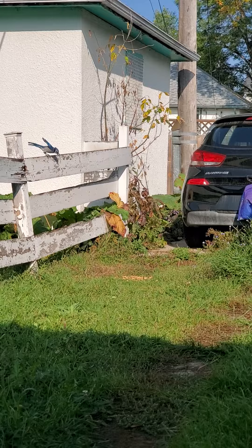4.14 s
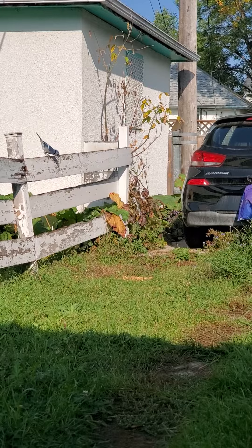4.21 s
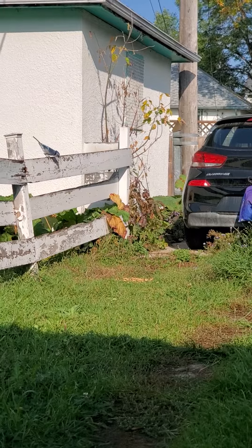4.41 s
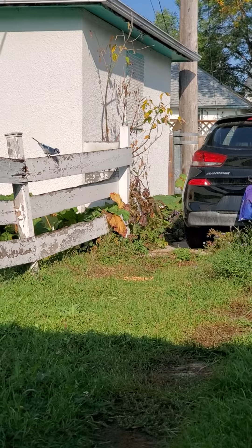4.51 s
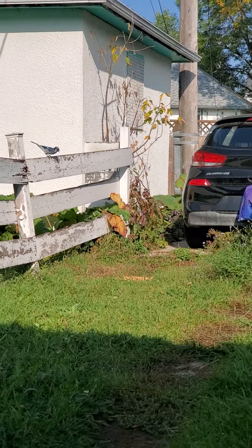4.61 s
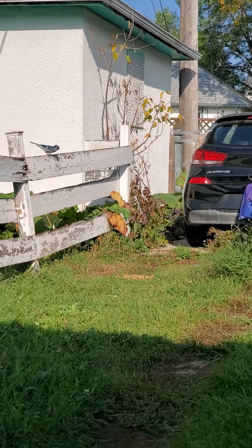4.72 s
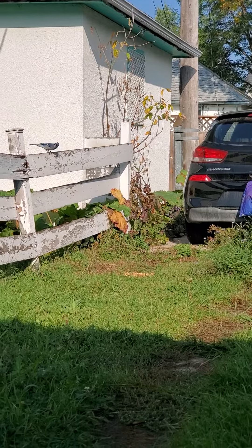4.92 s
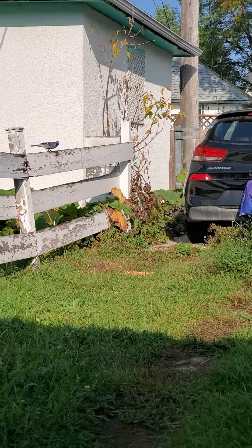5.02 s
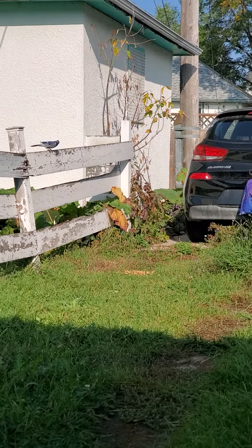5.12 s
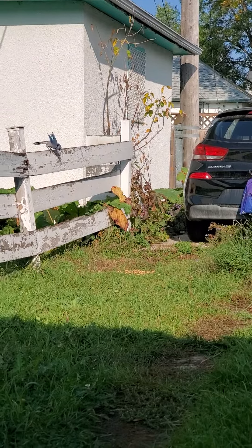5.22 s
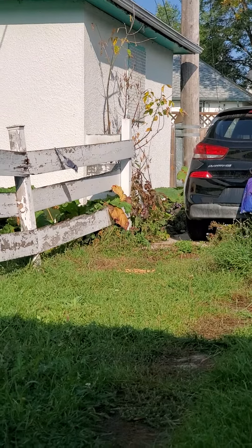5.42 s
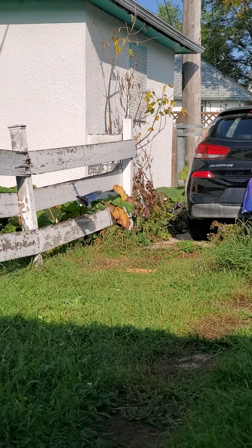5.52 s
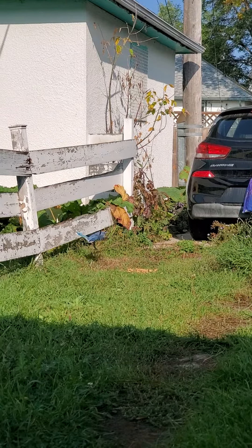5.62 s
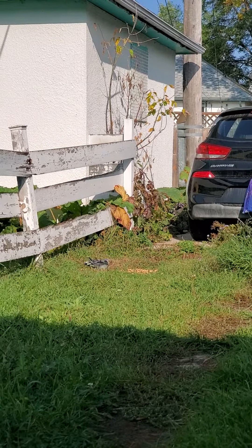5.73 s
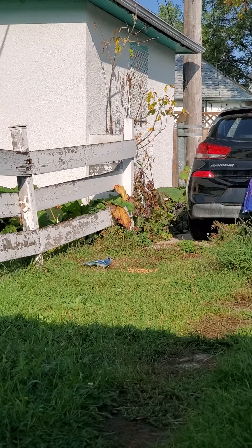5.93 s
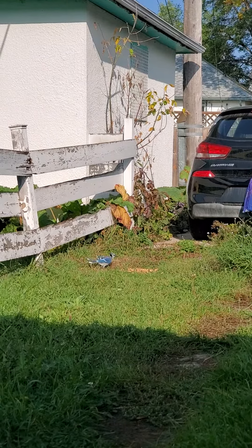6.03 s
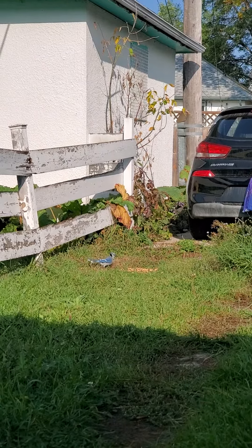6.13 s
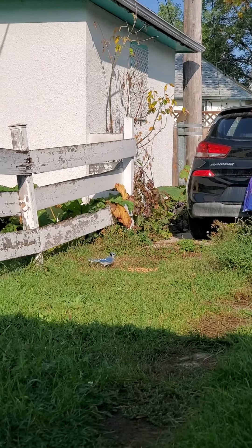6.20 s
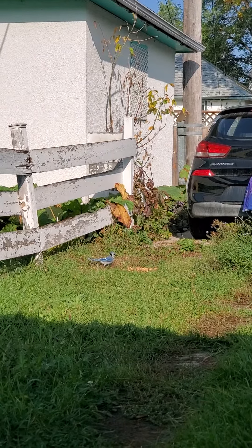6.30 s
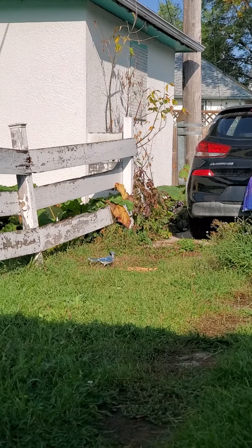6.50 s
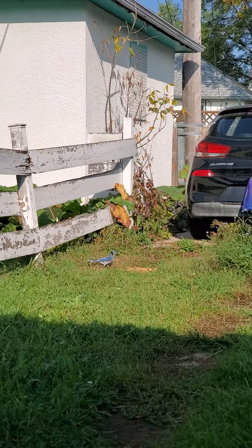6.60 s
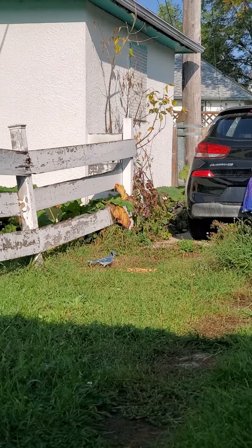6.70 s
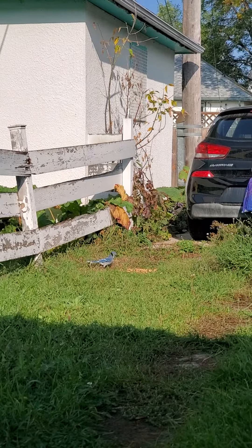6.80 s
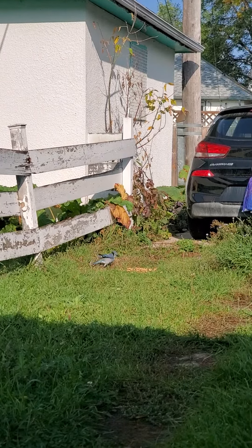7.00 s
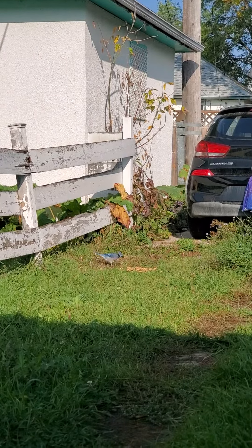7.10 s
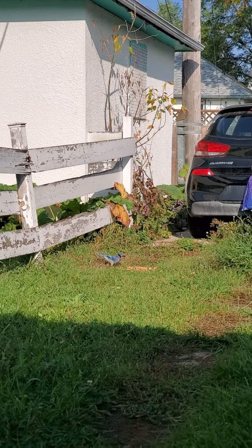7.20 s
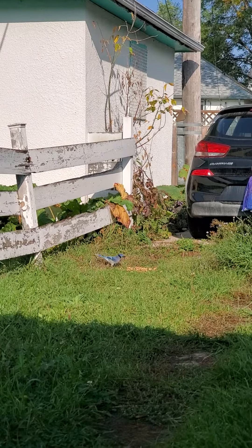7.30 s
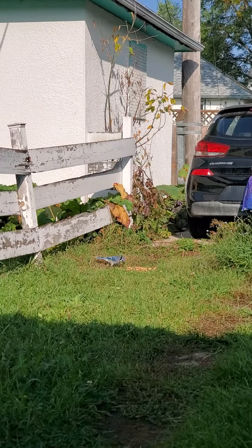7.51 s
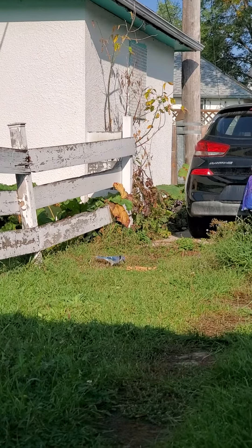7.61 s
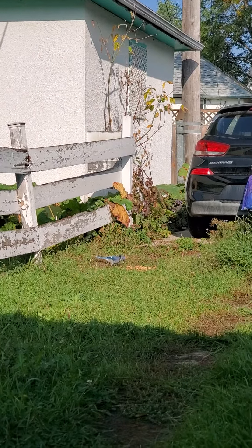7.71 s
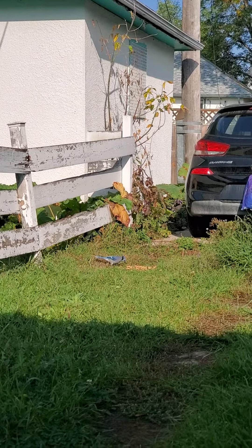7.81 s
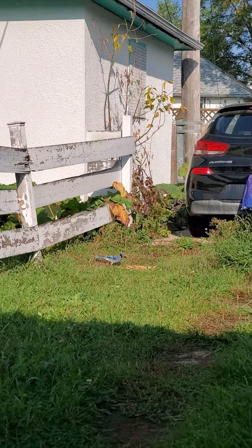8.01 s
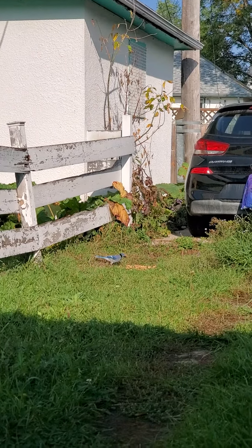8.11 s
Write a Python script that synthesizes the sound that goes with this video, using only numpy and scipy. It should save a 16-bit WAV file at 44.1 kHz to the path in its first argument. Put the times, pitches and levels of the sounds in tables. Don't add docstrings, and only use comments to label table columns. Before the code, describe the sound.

A back yard heard in stereo through a phone, with slight echoes from house walls. At once a sharp, falling jay bark sounds, then a louder one at 0.2 s, and until about 1.9 s several jays trade rapid, short, raspy notes, low and nasal against higher and brighter, with faint distant replies. Low wind gusts thump the microphone unevenly left and right, with tiny dry leaf crackles, fading after 2.2 s. Steady low traffic rumble and barely audible leaf hiss remain. Soft, low jay notes come singly at 2.6, 3.4, 3.7, 4.7, 5.0 and 6.4 s. Thin high sparrow chips recur throughout, clustered at 3.3-3.8 s and strongest at 6.9 s. A short scrape and hollow wooden knock lands at 3.2 s, a soft tap at 3.6 s. Faint leaf rustle comes at 5.75 s. From 5.8 s distant jays call weakly, and a deep, short croak ends it near 8 s.

```python
import sys
import numpy as np
from scipy import signal
from scipy.fft import rfft, irfft, next_fast_len
from scipy.io import wavfile
from scipy.ndimage import uniform_filter1d, map_coordinates

SR = 44100
rng = np.random.default_rng(int(sys.argv[2]) if len(sys.argv) > 2 else 0)


def voltage_ratio(decibels):
    exponent = np.asarray(decibels, float) / 20
    return 10 ** exponent


def file_out(sig):
    cols = np.atleast_2d(sig).T
    lim = np.clip(cols, -1, 1)
    pcm = np.round(lim * 32767).astype(np.int16)
    wavfile.write(sys.argv[1], SR, pcm)


N = 359415

# [t/s, level/dB]
TRAFFIC = [
    (2.3, -49.5),
    (3.1, -48),
    (3.9, -47.5),
    (4.3, -51.5),
    (4.6, -49.5),
    (5.1, -52),
    (5.8, -52.5),
    (6.5, -51.5),
    (7.2, -50),
    (8.15, -51),
]
# [t/s, level/dB]
BREEZE = [
    (0, -75.5),
    (.6, -77.5),
    (2.45, -78),
    (2.84, -75),
    (3.38, -78.5),
    (6.56, -80.5),
    (8.15, -81.5),
]
# [f/Hz, level/dB per Hz]
RUMBLE_SPECTRUM = [(12, -58), (20, -14), (27, -17), (47, -1.5), (65, 2.5), (93, 1), (113, -8.5), (144, -11),
                   (250, -26), (320, -19), (550, -120)]
HUM_SPECTRUM = [(88, -25), (150, -1), (342, -9), (394, -7.5), (475, -13.5), (780, -13.5), (1290, -18),
                (1780, -22.5), (2500, -22), (3250, -52), (5500, -120)]
LEAF_SPECTRUM = [(590, -64), (1000, -9), (1290, -8), (2020, -12.5), (3290, -7), (4390, -11), (6430, -12.5),
                 (7560, -19), (7920, -26.5), (8390, -37), (9860, -29), (10300, -29.5), (10900, -23),
                 (15100, -24.5), (15800, -17)]
BUFFET_SPECTRUM = [(12, -32), (20, -9.5), (54, 4.5), (75, 4), (145, -21.5), (315, -35.5), (400, -49),
                   (520, -61), (880, -120)]
# [f/Hz, left-right likeness]
PORT_LIKENESS = [(60, 1), (130, 0.98), (290, 0.89), (640, 0.63), (1410, 0.13), (3100, 0.029), (6820, 0.14),
                 (15000, 0.11)]
# [f/Hz, left minus right/dB]
PORT_BALANCE = [(60, -2.0), (180, -3), (550, -2.0), (1650, 0), (4970, 1.5), (15000, 2)]
# [t/s, length/s, peak level/dB, left minus right/dB]
GUSTS = [(0.037, 0.06, -29, -9.5), (0.073, 0.056, -35, 7), (0.115, 0.032, -26, -5), (0.18, 0.078, -36.5, 4),
         (0.365, 0.21, -42, 6), (0.529, 0.05, -32.5, -12), (0.569, 0.036, -39, -20),
         (0.706, 0.45, -45, -11.5), (1.01, 0.12, -43, -18), (1.073, 0.052, -42.5, 9),
         (1.21, 0.1, -39, -5.5), (1.296, 0.067, -36, -10), (1.47, 0.076, -44.5, -1),
         (1.715, 0.075, -41, -6), (1.83, 0.18, -44.5, -16), (1.988, 0.11, -36.5, -7),
         (2.087, 0.074, -29, 0), (2.237, 0.15, -51, -22), (2.5, 0.55, -54.5, 5)]
# [t/s, peak level/dB, length/s, low edge f/Hz]
RUSTLES = [(.7498, -51, 0.0017, 10600), (0.751, -55, .008, 10500), (.7847, -55, 0.0026, 10000),
           (1.43, -65, 0.032, 5000), (2.065, -64, .004, 8000), (2.19, -68, 0.043, 6000),
           (2.705, -69, .16, 2940), (4.332, -66, 0.043, 3000), (3.17, -77, 0.026, 3000),
           (5.73, -67, .1, 10000), (5.749, -62, 0.012, 11000), (5.79, -61, 0.015, 3000),
           (5.75, -56, .012, 3000), (.037, -60, .012, 9500), (.618, -62, .005, 10500),
           (.69, -67, .025, 10500)]
# [f/Hz, level/dB]
PORT_DIP = [(7600, 0), (8400, -14), (9900, -12), (10900, 0)]
# [t/s, peak level/dB, length/s]
SCRAPE = (3.162, -36.5, 0.043)
# [t/s, level/dB]
CRACK = (3.1762, -7)
# [t/s, peak level/dB, f/Hz]
TAP = (3.584, -40, 950)
# [f/Hz, width/Hz, level/dB]
RAIL_MODES = [(760, 200, -9), (1010, 110, -5), (1290, 110, -3), (1530, 110, -9), (1900, 250, -10),
              (2300, 500, -16), (3300, 1500, -20)]
# [t/s, length/s, top f/Hz, level/dB]
CHIPS = [(.163, .03, 5180, -64), (0.822, 0.041, 5280, -57.5), (2.141, 0.041, 5140, -61.5),
         (2.77, 0.04, 5270, -57), (3.325, 0.046, 5340, -53.5), (3.362, .018, 3130, -64),
         (3.739, .025, 3250, -65), (3.778, 0.017, 3140, -61), (3.815, .025, 5200, -68),
         (3.747, 0.045, 5170, -62), (4.278, 0.028, 5200, -66), (4.295, 0.036, 5120, -60),
         (4.345, 0.025, 3750, -62.5), (5.05, 0.037, 5230, -68), (5.074, 0.034, 5240, -59.5),
         (5.695, 0.029, 5310, -57), (6.32, 0.033, 5170, -57.5), (6.895, 0.019, 5290, -47.5),
         (7.442, .034, 5300, -56), (7.469, 0.029, 5230, -58), (7.584, .045, 5280, -69),
         (7.64, .04, 5280, -72), (5.733, .025, 5330, -65), (5.19, .04, 5200, -69), (4.36, .035, 5150, -69),
         (7.771, 0.036, 5000, -58), (7.95, 0.025, 4800, -64)]
# [f/Hz, t60/s]
WALLS = [(500, 0.55), (2000, 0.32), (5000, 0.17), (10000, 0.57)]
# [f/Hz, left minus right/dB]
SHADE = [(900, 1), (1400, -1), (2050, 1.5), (2450, 2.5), (2750, 11), (2950, 9.5), (3150, 1.5), (4200, -2),
         (5600, 3), (9000, 3)]
# [f/Hz, phase/radians]
AHEAD = [(300, .3), (900, 1.2), (1050, 2.3), (1400, 3.1), (1800, 4.3), (2050, 5.6), (2450, 5.3),
         (3100, 5.6), (4300, 7.7), (5600, 12), (9000, 19)]
# [t/s, length/s, start f/Hz, end f/Hz, level/dB]
FAR_JAY = [(.22, .035, 1180, 1295, -57), (.265, 0.069, 1425, 1427, -65.5), (.33, .045, 1300, 1254, -56),
           (1.09, .05, 1430, 1388, -69), (5.84, 0.077, 1290, 1387, -63.5), (5.91, 0.058, 1400, 1287, -57.5),
           (6.28, 0.092, 1270, 1480, -61), (6.45, 0.035, 1280, 1455, -67.5), (6.84, 0.13, 1420, 1283, -62),
           (7.43, 0.095, 1340, 1475, -63), (7.64, 0.045, 1500, 1440, -68), (7.89, 0.11, 1310, 1358, -61)]
DEEP_JAY = [
    (7.958, 0.0443, 670, 652, -55.5),
]
MID_JAY = [
    (.975, 0.09, 1190, 1225, -55),
    (1.11, .075, 1300, 1240, -54.5),
    (1.39, 0.09, 1225, 1242, -56.5),
    (1.485, 0.069, 1290, 1235, -50),
]
HIGH_JAY = [
    (.315, 0.058, 1431, 1315, -53.5),
    (.453, 0.055, 1625, 1345, -52),
    (.6, 0.068, 1436, 1364, -57.5),
    (.73, 0.053, 1490, 1423, -55.5),
    (.905, 0.052, 1474, 1318, -57),
    (1.07, 0.051, 1260, 1350, -54),
    (1.279, .052, 1440, 1372, -52.5),
]
LOUD_JAY = [
    (.186, 0.046, 1412, 1471, -46),
]
FIRST_JAY = [
    (.034, .056, 1910, 1447, -49.5),
]
# [t/s, length/s, f/Hz, level/dB, brightness/dB per octave]
SOFT_JAY = [
    (2.64, 0.053, 915, -54.5, 1),
    (3.42, 0.067, 900, -49.5, 0),
    (3.665, 0.066, 914, -53, 2),
    (4.72, 0.07, 905, -50, -3.5),
    (5.048, 0.051, 1002, -57.5, -1),
    (6.364, 0.064, 904, -51.5, -0.5),
]
LOW_JAY = [
    (.175, 0.038, 937, -51.5, -5.5),
    (.318, 0.058, 950, -49.5, -5),
    (.48, 0.07, 987, -49, -2.5),
    (.638, 0.074, 999, -48, -3),
    (.795, 0.069, 1038, -49, -3),
    (.948, 0.068, 1052, -48.5, -2.5),
    (1.35, .066, 1063, -47.5, 0),
    (1.635, 0.069, 1052, -46, -1),
    (1.803, 0.063, 1037, -47, -3),
]
LOW_MUTTER = [
    (1.012, 0.045, 1053, -57, -10),
    (1.115, .088, 1050, -60.5, -12),
]
# [f/Hz, level/dB]
FAR_THROAT = [(1000, -33), (1400, 5), (2700, -29), (4000, -31)]
DEEP_THROAT = [(700, -25), (1350, -6), (2000, -0.5), (2650, 3.5), (3300, -6), (4500, -13), (9000, -45)]
SOFT_THROAT = [(900, -15), (1050, 6), (1800, 4.5), (2700, -.5), (3600, -11.5), (4500, -13), (5500, -16),
               (9000, -47)]
MID_THROAT = [(1250, -4.5), (2500, 0.5), (3700, -9), (5000, -11), (6200, -15), (9000, -54)]
LOW_THROAT = [(880, -16), (1060, -6), (1900, 0.5), (2900, 1), (3900, -6.5), (4400, -12), (5500, -10),
              (7000, -16.5), (9000, -61)]
HIGH_THROAT = [(1400, -5), (2800, 5.5), (4200, 0), (5600, 4.5), (7000, 0), (9000, -41)]
LOUD_THROAT = [(1450, -7.5), (2900, 3.5), (4400, -1), (5800, 4.5), (7300, -9), (9500, -32)]
FIRST_THROAT = [(1500, 0), (1750, -18), (2900, 1), (3250, 6), (4300, 4), (5000, -2), (6000, 2), (7000, -9),
                (9500, -32)]


def unit(x):
    return x / np.sqrt(np.mean(np.abs(x) ** 2) + 1e-20)


def along(points, hz):
    f, v = np.transpose(points)
    return np.interp(np.log(hz + 1), np.log(f + 1), v)


def level_curve(rows):
    s, db = np.transpose(rows)
    return np.interp(np.arange(N) / SR, s, db)


def wobble(rate, size):
    knots = rng.standard_normal(size // 20 + 8)
    return map_coordinates(knots, [np.arange(size) * rate / SR])


def filtered(x, response):
    m = next_fast_len(N + SR // 2)
    return irfft(rfft(x, m) * response(np.fft.rfftfreq(m, 1 / SR)), m)[..., :N]


def add(track, s, sound):
    part = track[round(s * SR):][:len(sound)]
    part += sound[:len(part)]


def rush(spectrum, patchy_db):
    z = signal.stft(rng.standard_normal((2, N)), nperseg=512)[2]
    patches = uniform_filter1d(rng.standard_normal(z.shape[1:]), 6, 0)
    patches = unit(uniform_filter1d(patches, 14, 1))
    pair = signal.istft(z * voltage_ratio(patchy_db * patches), nperseg=512)[1][:, :N]

    def mid_side(hz):
        angle = np.arccos(np.clip(along(PORT_LIKENESS, hz), -1, 1)) / 2
        return voltage_ratio(along(spectrum, hz)) * np.array([np.cos(angle), np.sin(angle)])

    mid, side = filtered(pair, mid_side)
    return unit(np.array([mid + side, mid - side]))


def town():
    rumble = voltage_ratio(level_curve(TRAFFIC) - 0.4) * rush(RUMBLE_SPECTRUM, patchy_db=1.0)
    hum = voltage_ratio(-57.5) * rush(HUM_SPECTRUM, patchy_db=0.96)
    leaves = voltage_ratio(level_curve(BREEZE) + 17.5) * rush(LEAF_SPECTRUM, patchy_db=1.65)
    halves = np.array([[.5], [-.5]])
    return filtered(rumble + hum + leaves, lambda hz: voltage_ratio(halves * along(PORT_BALANCE, hz)))


def wind():
    lull_db = -63
    s, length, db, pan_db = np.transpose(GUSTS)
    t = np.arange(0, N / SR, 1 / 500)
    swell = np.exp(-(2.7 * (t[:, None] - s) / length) ** 2)
    powers = [voltage_ratio(2 * lull_db) + swell @ voltage_ratio(2 * db + side * pan_db) for side in (1, -1)]
    strength = np.sqrt([np.interp(np.arange(N) / SR, t, power) for power in powers])
    air = rng.standard_normal((2, N)) + 0.75 * rng.standard_normal(N)
    thumps = filtered(air, lambda hz: voltage_ratio(along(BUFFET_SPECTRUM, hz)))
    eddies = signal.hilbert(thumps, next_fast_len(N))[:, :N]
    steadier = unit(np.real(eddies / np.abs(eddies) ** 0.18))
    return voltage_ratio(-1.1) * strength * steadier


def rustles():
    out, t = np.zeros((N, 2)), np.arange(SR // 4) / SR
    for s, db, length, low_hz in RUSTLES:
        crackle = voltage_ratio(1.7 * wobble(370, len(t)))[:, None]
        grains = rng.standard_normal((len(t), 2)) * crackle
        highpass = signal.butter(4, low_hz, "high", fs=SR, output="sos")
        bright = signal.sosfilt(highpass, grains, axis=0)
        shape = np.sin(np.pi * np.clip(t / length, 0, 1))[:, None]
        add(out, s, voltage_ratio(db + 4.0) * shape * bright)
    return filtered(out.T, lambda hz: voltage_ratio(along(PORT_DIP, hz)))


def rail(hz):
    ring = 0
    for k, (centre, width, db) in enumerate(RAIL_MODES):
        ring = ring + (-1) ** k * voltage_ratio(db) * 1j * hz * width / (centre ** 2 - hz ** 2 + 1j * hz * width)
    return ring / (1 + 1j * hz / 4000) ** 3


def knocks():
    blows, t = np.zeros(N), np.arange(SR // 8) / SR
    s, db, length = SCRAPE
    u = np.clip(t / length, 0, 1)
    stroke = u ** 1.5 * (1 - u) ** 3
    add(blows, s, voltage_ratio(db + 38.0) * stroke * rng.standard_normal(len(t)))
    crack_s, crack_db = CRACK
    blows[round(crack_s * SR)] -= voltage_ratio(crack_db)
    out = filtered(blows, rail)
    s, db, hz = TAP
    cycle = (t - .002) * hz
    add(out, s - .002, voltage_ratio(db) * np.sin(2 * np.pi * cycle) * np.exp(-6 * cycle ** 2))
    return out


def later(lag_s, pan_db):
    return lambda hz: voltage_ratio(-pan_db) * np.exp(-2j * np.pi * hz * lag_s)


def shaded(hz):
    return voltage_ratio(-along(SHADE, hz)) * np.exp(-1j * along(AHEAD, hz))


def placed(x, right, early_db, wet_db):
    direct = np.array([x, filtered(x, right)])
    hz, t, z = signal.stft(rng.standard_normal((2, SR // 2)), SR, nperseg=256)
    decay = voltage_ratio(-60 * t / along(WALLS, hz)[:, None])
    wash = signal.istft(z * decay, SR, nperseg=256)[1]
    echoes = voltage_ratio(wet_db) * np.pad(wash, ((0, 0), (SR // 60, 0))) / np.linalg.norm(wash[0])
    bounces = rng.integers(40, 900, (2, 6))
    echoes[[[0], [1]], bounces] = voltage_ratio(early_db) * rng.standard_normal((2, 6))
    return direct + signal.fftconvolve(x[None], echoes, axes=1)[:, :N]


def sparrow():
    out, size = np.zeros(N), SR // 10
    for s, length, top_hz, db in CHIPS:
        u = np.clip(np.arange(size) / SR / length, 0, 1)
        pitch = top_hz * (1 - 0.11 * np.abs(2 * u - 1) ** 4 + .012 * wobble(400, size))
        shape = np.sin(np.pi * u) ** 1.1 * voltage_ratio(3 * wobble(300, size))
        add(out, s, voltage_ratio(db + 3.5) * shape * np.sin(2 * np.pi * np.cumsum(pitch) / SR))
    return out


def scooped(rows, share):
    return [(s, length, share * hz, hz, db, tilt_db) for s, length, hz, db, tilt_db in rows]


def tinted(rows, tilt_db):
    return [(*row, tilt_db) for row in rows]


def jay(notes, throat, rough, jitter, rasp_db, swell=0.4, fade=0.63, settle=4.32, press=0.18,
        buzz=0.14, buzz_hz=190):
    out = np.zeros(N)
    throat_peak_hz = max(throat, key=lambda point: point[1])[0]
    for s, length, start_hz, end_hz, db, tilt_db in notes:
        size = int(1.125 * length * SR) + 60
        u = np.clip(np.arange(size) / SR / (1.129 * length), 0, 1)
        effort = u ** swell * (1 - u) ** fade
        effort /= effort.max()
        glide = end_hz + (start_hz - end_hz) * np.exp(-settle * u)
        phase = 2 * np.pi * np.cumsum(glide * (1 + jitter * wobble(389, size))) / SR
        membrane_hz = buzz_hz * (1 + 0.13 * wobble(59, size))
        beat = buzz * effort * np.exp(2j * np.pi * np.cumsum(membrane_hz) / SR)
        note = np.zeros(size)
        for k in range(1, 10):
            octaves_up = max(0, np.log2(k * end_hz / throat_peak_hz))
            colour = voltage_ratio(along(throat, k * glide) + tilt_db * octaves_up)
            flutter = 1 + rough * (wobble(329, size) + 1j * wobble(343, size))
            rasp = voltage_ratio(rasp_db) * np.sqrt(k) * (wobble(1511, size) + 1j * wobble(1485, size))
            wave = flutter + rasp + beat
            wave *= 1.2 / np.sqrt(np.average(np.abs(wave) ** 2, weights=effort ** 2))
            note += effort ** (1 + press * k) * colour * np.real(wave * np.exp(1j * k * phase))
        add(out, s - .06 * length, voltage_ratio(db) * note)
    return out


def jays():
    far = jay(tinted(FAR_JAY, tilt_db=-2), FAR_THROAT, rough=0.3, jitter=0.01, rasp_db=-24,
              swell=0.9, fade=0.35, settle=1.8)
    soft = jay(scooped(SOFT_JAY, share=.925), SOFT_THROAT, rough=.3, jitter=.012, rasp_db=-16,
               swell=.7, press=.45, buzz=.38, buzz_hz=200)
    deep = jay(tinted(DEEP_JAY, tilt_db=.1), DEEP_THROAT, rough=.35, jitter=.01, rasp_db=-15, swell=.8)
    mid = jay(tinted(MID_JAY, tilt_db=1.7), MID_THROAT, rough=0.55, jitter=.022, rasp_db=-11,
              swell=0.45, fade=0.7)
    low_notes = scooped(LOW_JAY, share=.91) + scooped(LOW_MUTTER, share=1)
    low = jay(low_notes, LOW_THROAT, rough=.5, jitter=.019, rasp_db=-19,
              swell=.35, settle=5.5, buzz=.35, buzz_hz=190)
    high = jay(tinted(HIGH_JAY, tilt_db=-7.5), HIGH_THROAT, rough=.42, jitter=.018, rasp_db=-18, swell=.35)
    loud = jay(tinted(LOUD_JAY, tilt_db=.1), LOUD_THROAT, rough=0.7, jitter=0.03, rasp_db=-11,
               swell=0.96, fade=1.1, buzz=.6, buzz_hz=330)
    first = jay(tinted(FIRST_JAY, tilt_db=.1), FIRST_THROAT, rough=0.5, jitter=0.02, rasp_db=-16,
                swell=.35, settle=4, press=.2, buzz=.4, buzz_hz=250)
    flock = placed(far, later(.0001, pan_db=-2.0), early_db=-35, wet_db=-1.0)
    flock += placed(soft + deep, shaded, early_db=-24, wet_db=-17)
    flock += placed(high + low + mid, shaded, early_db=-19, wet_db=-12.5)
    flock += placed(loud, later(.00021, pan_db=2.5), early_db=-15, wet_db=-10.5)
    flock += placed(first, later(.000135, pan_db=.5), early_db=-21, wet_db=-14)
    return flock


def scene():
    rail_knocks = placed(knocks(), later(0, pan_db=-1), early_db=-24, wet_db=-20)
    chips = placed(sparrow(), later(.00025, pan_db=2.0), early_db=-15, wet_db=-6.0)
    return town() + wind() + rustles() + rail_knocks + chips + jays()


def band_limit(x):
    return signal.sosfilt(signal.butter(12, 15990, fs=SR, output="sos"), x)


def record(dry):
    top_hz = 15780
    mix = filtered(dry, lambda hz: hz < top_hz)
    return band_limit(mix)


dry = scene()
out = record(dry)
file_out(out)
```